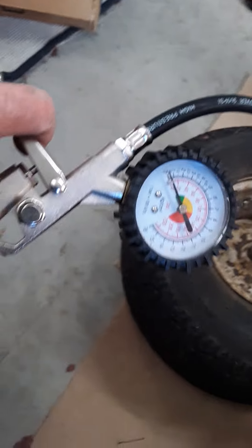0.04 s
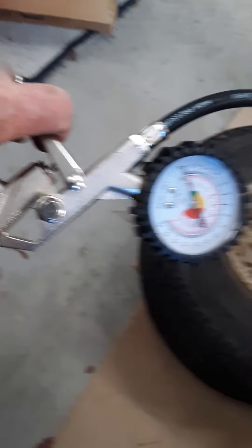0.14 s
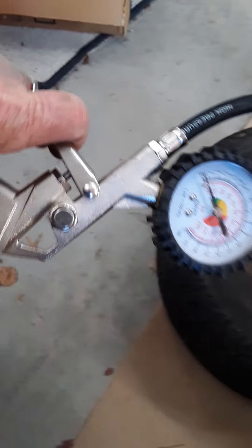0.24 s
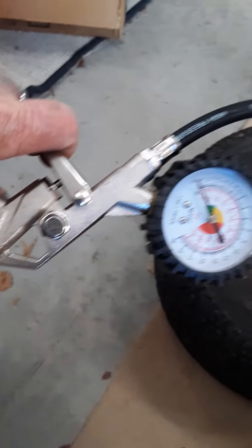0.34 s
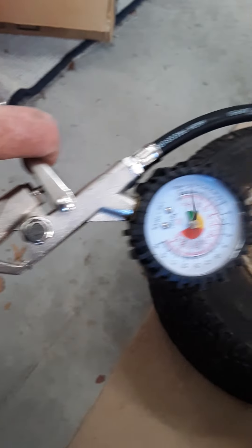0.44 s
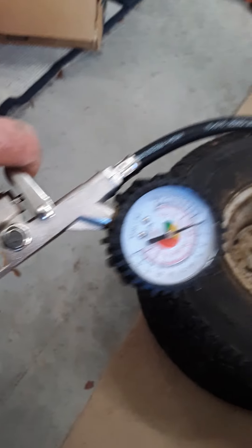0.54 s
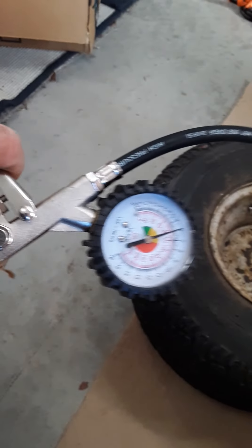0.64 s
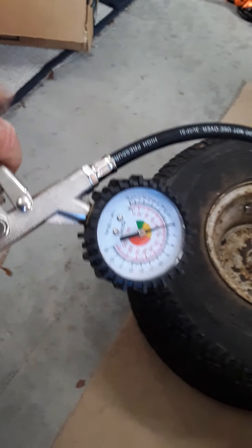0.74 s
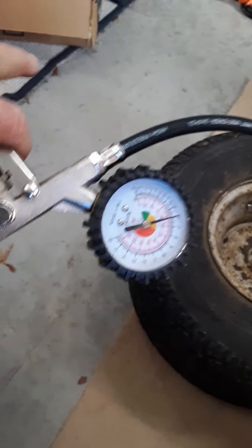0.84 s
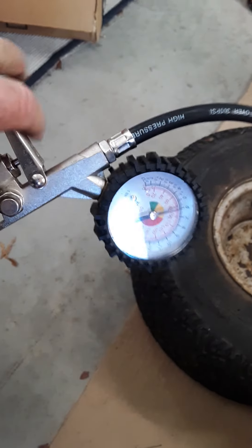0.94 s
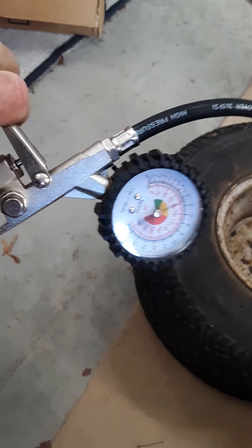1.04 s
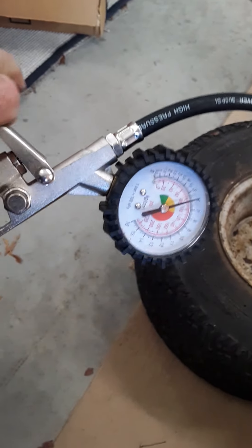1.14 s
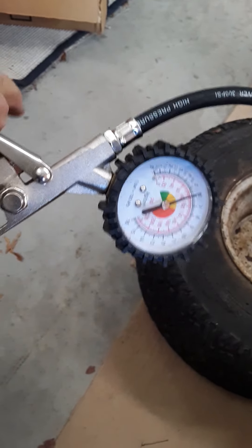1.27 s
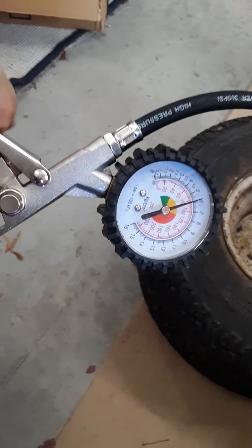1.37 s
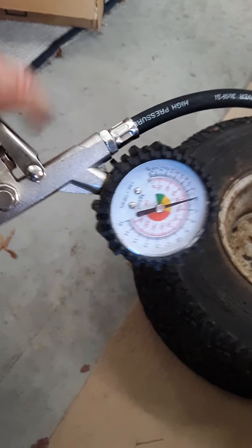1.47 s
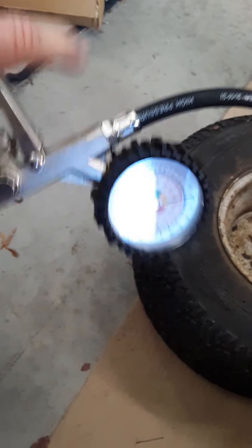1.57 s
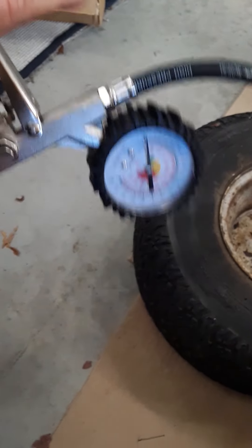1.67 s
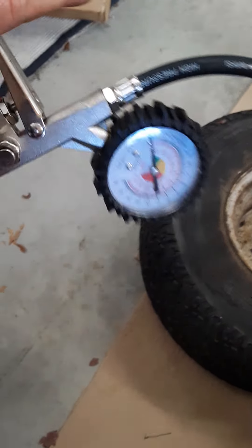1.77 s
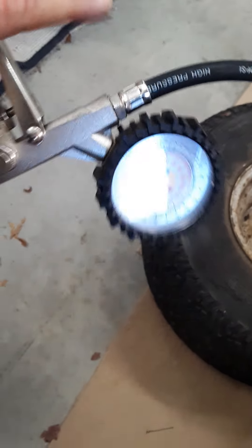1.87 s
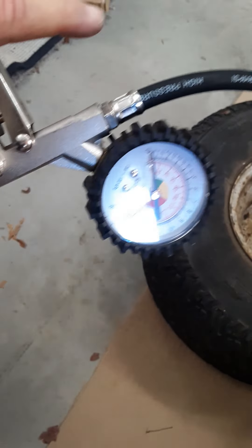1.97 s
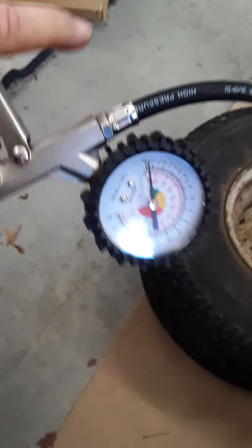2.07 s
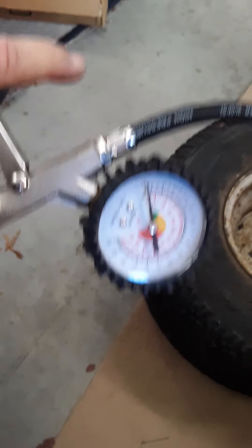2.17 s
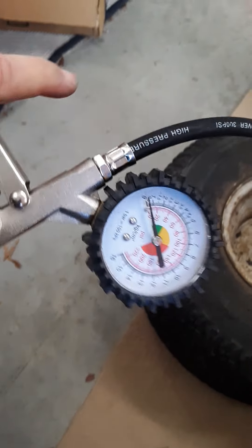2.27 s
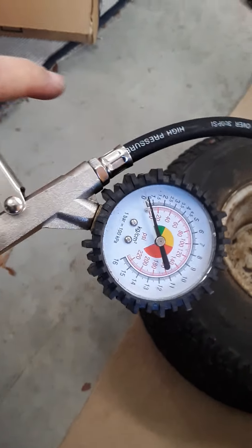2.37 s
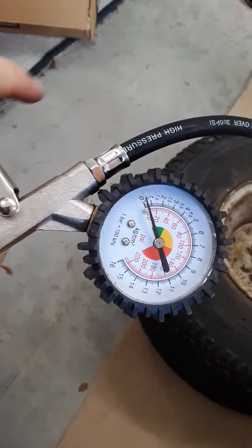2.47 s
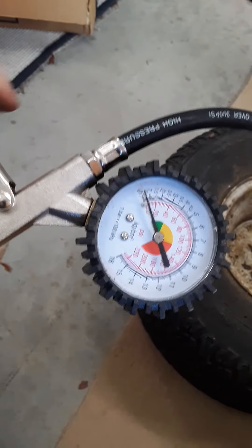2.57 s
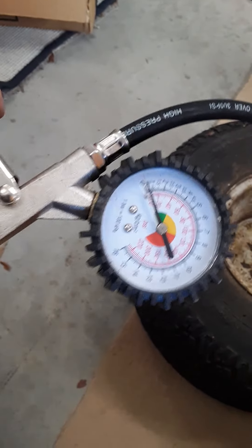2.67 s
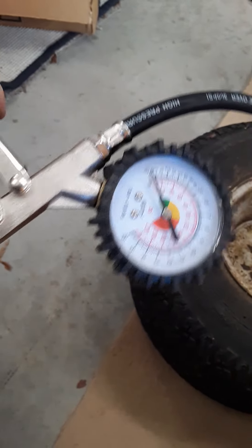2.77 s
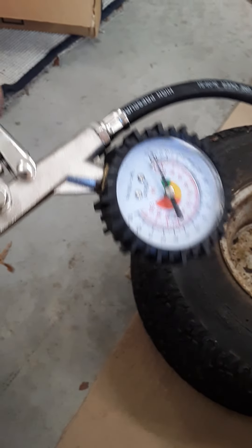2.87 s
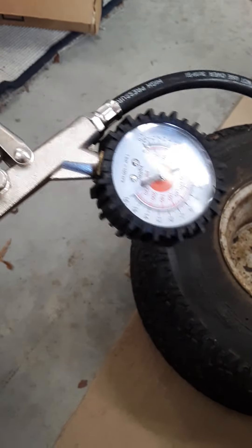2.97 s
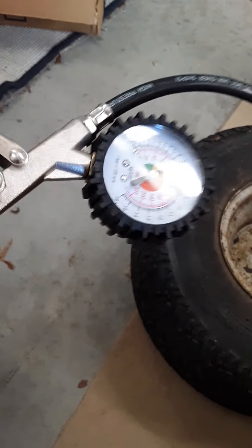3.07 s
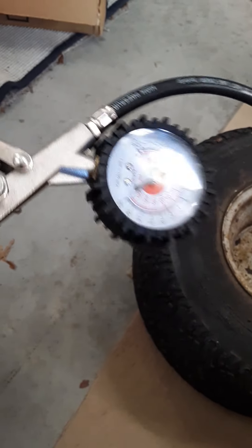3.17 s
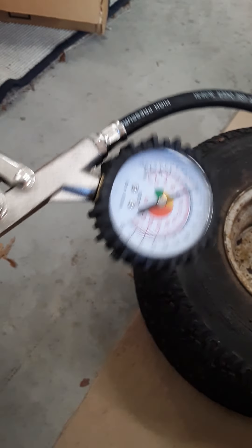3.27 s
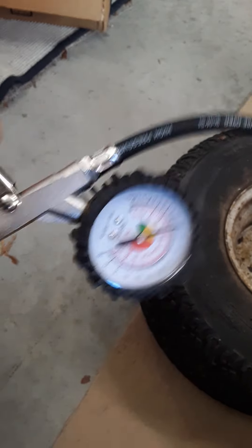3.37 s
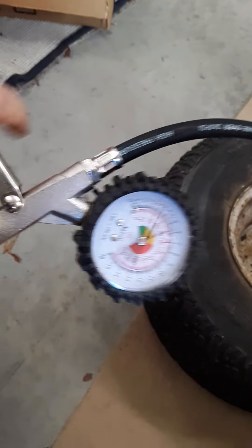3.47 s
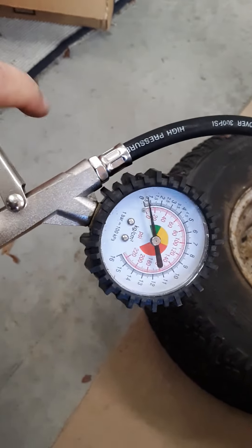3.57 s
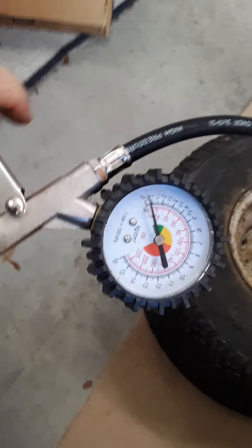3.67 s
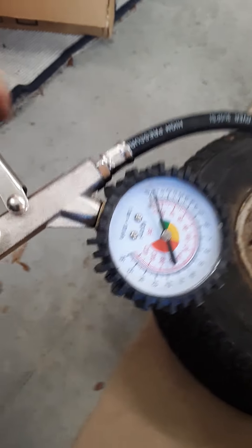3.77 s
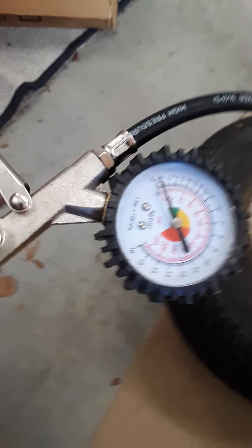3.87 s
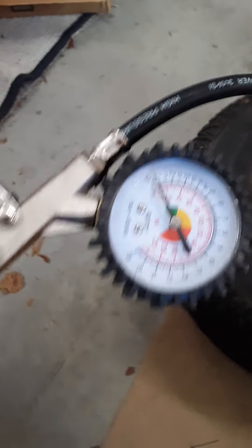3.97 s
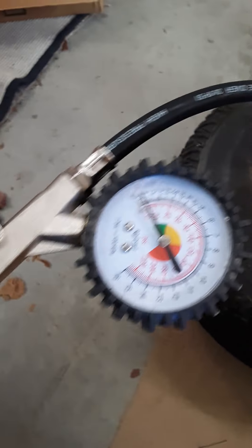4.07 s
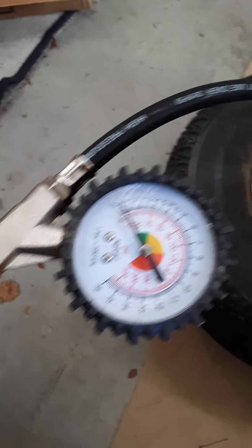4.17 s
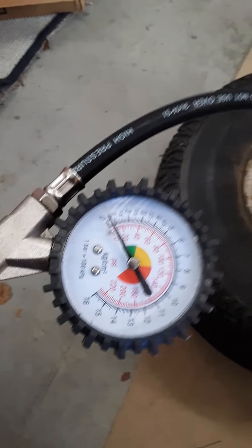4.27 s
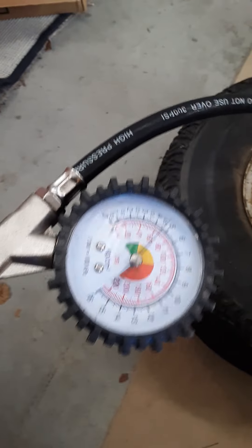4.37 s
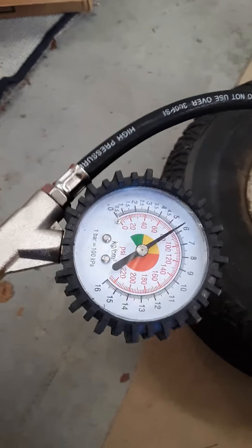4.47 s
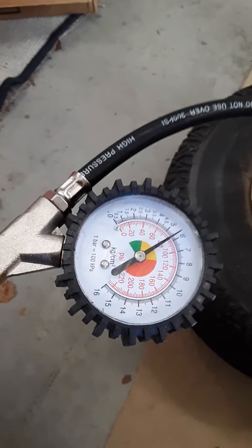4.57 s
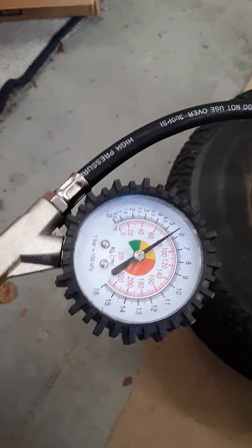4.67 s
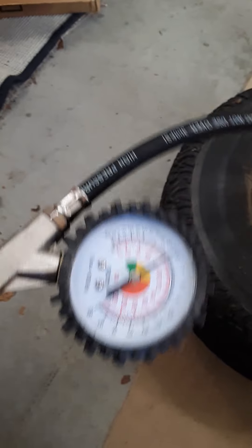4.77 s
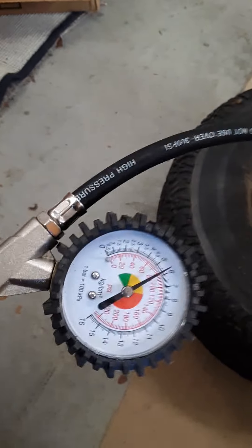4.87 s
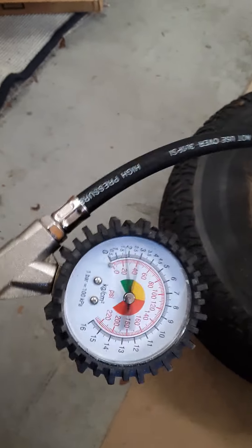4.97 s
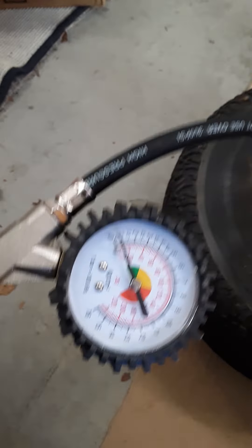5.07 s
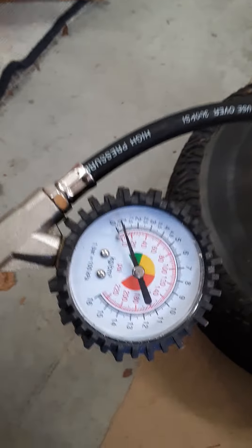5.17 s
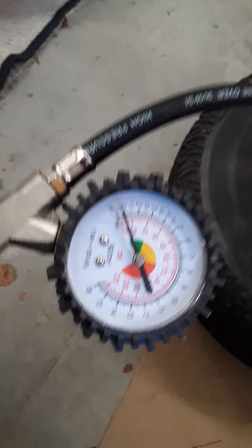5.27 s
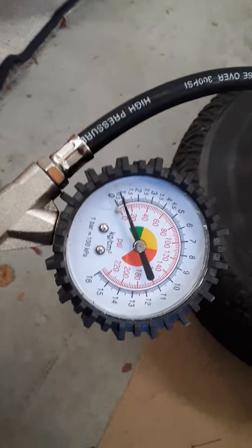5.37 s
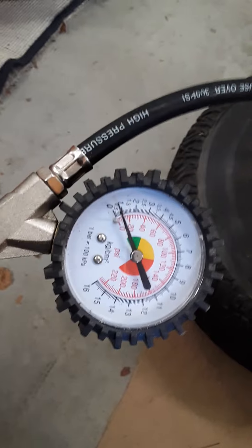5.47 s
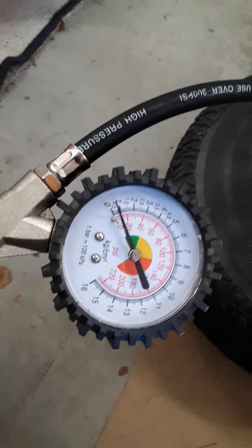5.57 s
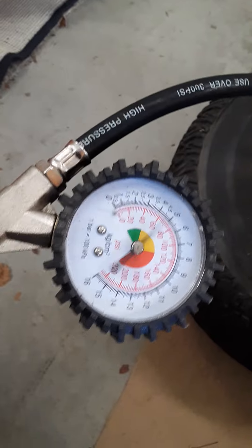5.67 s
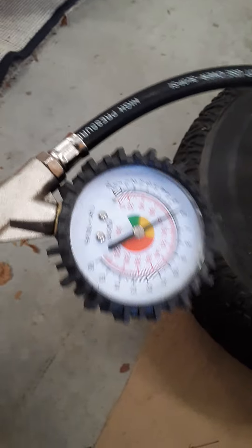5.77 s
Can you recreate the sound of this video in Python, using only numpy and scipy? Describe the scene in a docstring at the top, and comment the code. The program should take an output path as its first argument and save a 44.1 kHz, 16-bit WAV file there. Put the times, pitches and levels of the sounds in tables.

```python
"""A hand inflator fills a small tire on a garage floor, over a low rumble and a faint, wavering hum.
A leaking fitting hisses throughout; a knock and a sliding hose come before the first squeeze.
Two squeezes follow, then a pause and three more; each blows a bright jet through the valve, rings the air
cavities and sounds a fluttering whistle, and the hose tone and the tire's faint ring trail behind.
The hose shudders around the third and fourth squeezes; later the handle scrapes and knocks in a cluster."""
import sys
import numpy as np
from scipy import signal
from scipy.fft import rfft, irfft
from scipy.io import wavfile
from scipy.ndimage import uniform_filter1d, map_coordinates

SR = 44100
rng = np.random.default_rng(int(sys.argv[2]) if len(sys.argv) > 2 else 0)


def unload_wav(signal):
    """Save mono or channel-first audio to the path in sys.argv[1] as 16-bit WAV at rate SR, clipped to [-1, 1]."""
    wavfile.write(
        sys.argv[1],
        SR,
        np.round(np.clip(np.atleast_2d(signal).T, -1, 1) * 32767).astype(np.int16),
    )


N = 256740
TIME = np.arange(N) / SR
FREQS = np.maximum(np.arange(N // 2 + 1) * SR / N, 1)

# squeezes of the lever: press t/s, release t/s, opening time/s, jet level/dB, cavity level/dB,
# whistle level/dB, left-right balance of the jet/dB
SQUEEZES = [(0.431, 1.025, .12, -36, -36, -34.5, -0.9), (1.062, 1.627, 0.062, -35.5, -35.5, -36, -1),
            (2.93, 3.524, 0.026, -35.5, -35.5, -34.5, -1), (4.406, 4.998, 0.018, -34.5, -35, -36, 1.6),
            (5.697, 5.9, 0.022, -34.5, -35, -35, 1.5)]
# how the cavities start and stop ringing
CAVITY_BUILD_S, CAVITY_FADE_S = 0.03, 0.07


def from_db(db):
    """Turn decibels into a gain."""
    return 10 ** (np.asarray(db) / 20)


def rms_one(x):
    """Scale a signal to an rms (average strength) of one."""
    return x / np.sqrt(np.mean(x ** 2) + 1e-20)


def in_time(rows):
    """Draw each column of a table as a curve with a value at every sample."""
    s, *columns = np.transpose(rows)
    return [np.interp(TIME, s, c) for c in columns]


def at_hz(points):
    """Draw a spectrum table as a curve over all frequencies."""
    hz, value = np.transpose(points)
    return np.interp(np.log(FREQS), np.log(hz), value)


def gate(start, end, rise_s, fall_s):
    """Stay at one between start and end, dying away on both sides."""
    before = np.minimum(TIME - start, 0) / rise_s
    after = np.maximum(TIME - end, 0) / fall_s
    return np.exp(np.maximum(before - after, -40))


def strokes(rows, rise_s, fall_s):
    """Add up the loudness curves of a table of strokes."""
    return sum(from_db(db) * gate(start, end, rise_s, fall_s) for start, end, db in rows)


def flutter(rate, depth_db):
    """A random gain that wanders at about the given rate in Hz, keeping the mean power."""
    slow = rms_one(irfft(rfft(rng.standard_normal(N)) / (1 + (FREQS / rate) ** 2), N))
    return rms_one(from_db(depth_db * slow))


def panned(balance_db):
    """Left and right gains whose total power stays constant."""
    gains = from_db(np.array([[.5], [-.5]]) * balance_db)
    return gains / np.sqrt(np.mean(gains ** 2, axis=0))


def pair(mid, side, likeness):
    """Mix two noises into left and right with a given likeness (correlation)."""
    likeness = np.clip(likeness, -.99, .99)
    shared = np.sqrt((1 + likeness) / 2) * mid
    opposed = np.sqrt((1 - likeness) / 2) * side
    return shared + opposed * np.array([[1], [-1]])


def turbulence(spectrum, balance=None):
    """Stereo noise of a given colour; the mean of left and right has unit rms."""
    # likeness of the two microphones: f/Hz, correlation
    ear_likeness = [(100, 0.87), (400, 0.73), (700, 0.65), (1100, 0.2), (2000, 0), (16000, 0)]
    # sound from the middle: f/Hz, left-right balance/dB
    centred = [(20, 0), (20000, 0)]
    if balance is None:
        balance = centred
    white = pair(*rfft(rng.standard_normal((2, N))), at_hz(ear_likeness))
    noise = irfft(white * from_db(at_hz(spectrum)) * panned(at_hz(balance)), N)
    return noise / np.std(noise.mean(axis=0))


def resonance(x, hz, width_hz):
    """Ring at one pitch: a two-pole filter with a gain of one at its peak."""
    r = np.exp(-np.pi * width_hz / SR)
    feed = np.array([1, 0, -1]) * (1 - r * r) / 2
    ring = [1, -2 * r * np.cos(2 * np.pi * hz / SR), r * r]
    return signal.lfilter(feed, ring, x)


def blown(modes):
    """Turbulence keeps each air resonance ringing."""
    out = np.zeros((2, N))
    for hz, width_hz, level_db, balance_db, likeness in modes:
        once = resonance(rng.standard_normal((2, N)), hz, width_hz)
        ringing = resonance(once, hz, width_hz)  # a second pass makes it narrower
        ringing = panned(balance_db) * pair(*ringing, likeness)
        out += from_db(level_db) * ringing / np.std(ringing.mean(axis=0))
    return out


def whistling(modes):
    """A whistle feeds back on itself; here its strength is evened by dividing by its recent power."""
    tone = blown(modes)
    return tone / np.sqrt(uniform_filter1d(tone.mean(axis=0) ** 2, size=500) + 0.78)


def moving_band(centre_hz, width_hz):
    """A band of stereo noise whose centre glides."""
    slow = irfft(rfft(rng.standard_normal((2, 2, N))) / (1 + (2 * FREQS / width_hz) ** 2), N)
    phase = 2 * np.pi * np.cumsum(centre_hz) / SR
    return rms_one(slow[0] * np.cos(phase) + slow[1] * np.sin(phase))


def reflected(x, sway_db):
    """Delayed copies from close surfaces carve notches in the hiss, which drift as the hand moves."""
    # reflections from tire, hand and floor: delay/s, level/dB
    echoes = [(.0009, -10.5), (.0017, -19), (.0031, -10), (.0052, -10)]
    out = x.copy()
    for delay_s, level_db in echoes:
        lag = delay_s * SR * flutter(rate=0.39, depth_db=sway_db)
        places = [np.arange(N) - lag]
        delayed = [map_coordinates(side, places, order=3, mode="mirror") for side in x]
        out += from_db(level_db) * np.array(delayed)
    return out * np.std(x) / np.std(out)


def airflow(squeeze, fade_s, build_s=0.00075, lag_s=0):
    """The response to one squeeze: it follows the opening valve, builds up, holds and fades on release."""
    press, release, opening_s = squeeze[:3]
    t = TIME - lag_s
    opened = np.clip((t - press) / opening_s, 0, 1)
    keep = np.exp(-1 / (build_s * SR))
    built = signal.lfilter([1 - keep], [1, -keep], opened)
    return built * np.exp(-np.clip((t - release) / fade_s, 0, 40))


def room_rumble():
    """Low noise in the room, slowly changing in level."""
    # loudness curve: t/s, level/dB
    rumble_level = [(0, -84), (0.55, -65), (1.3, -62.5), (2.4, -60.5), (5.8, -63.5)]
    # colour of the noise: f/Hz, relative level/dB
    rumble_colour = [(20, -34), (40, -27), (60, 1), (100, 5.5), (170, 4.5), (250, -4.5), (400, -24),
                     (800, -20), (2000, -38)]
    level_db, = in_time(rumble_level)
    return from_db(level_db) * turbulence(rumble_colour)


def room_hum():
    """Something hums faintly: one sine tone that wavers in pitch and strength."""
    # loudness curve: t/s, level/dB
    hum_level = [(0.2, -79), (0.85, -64), (1.3, -60), (2.15, -54), (2.45, -62), (2.75, -54.5),
                 (3.55, -72.5), (3.9, -64), (5.0, -58.5), (5.3, -73), (5.8, -62)]
    level_db, = in_time(hum_level)
    pitch_hz = 131.5 * flutter(rate=6.5, depth_db=0.26)
    tone = np.sqrt(2) * np.sin(2 * np.pi * np.cumsum(pitch_hz) / SR)
    return from_db(level_db) * tone * flutter(rate=5.1, depth_db=3.5)


def leak():
    """A fitting hisses all the time, sputtering slightly; it weakens as the open valve drains the pressure."""
    # strength of the leak: t/s, hiss level/dB, fine spray level/dB, low rush level/dB,
    # centre f/Hz of the gliding band in the hiss
    leak_course = [(0.0, -54.5, -51.1, -54, 7200), (0.4, -52, -50.1, -49, 6370),
                   (2.05, -48.7, -49, -54, 6140), (2.7, -46.5, -49, -52.5, 6480),
                   (4.1, -46, -49, -47.5, 7305), (5.25, -47, -46, -50, 6360), (5.7, -46.5, -44, -49, 7340)]
    # colours of the hiss, spray and rush: f/Hz, relative level/dB
    hiss_colour = [(1500, -34), (3000, -18), (4000, -5.5), (5000, -2.5), (6000, 0), (6700, -1),
                   (7700, -1.5), (8500, -7.5), (11000, -11)]
    spray_colour = [(6000, -54), (8500, -7.5), (10000, -6), (12000, -0.5), (14000, -3), (16000, -1.5)]
    rush_colour = [(300, -21.5), (800, -27), (1200, -23), (1500, -10.5), (1800, 0), (2200, -4), (2450, -2),
                   (2620, 1.5), (2850, -4.5), (3100, -5.5), (4500, -17)]
    # side the leak is heard on: f/Hz, left-right balance/dB
    leak_balance = [(60, -6), (99, 8), (160, 0.0), (270, 0.5), (450, 9), (740, 0.5), (1220, 1), (2010, -8),
                    (3330, 2), (5500, -5), (9080, 1), (15000, -2.0)]
    drop_db, drain_s, refill_s = -7, 0.095, 0.013
    hiss_db, spray_db, rush_db, centre_hz = in_time(leak_course)
    steady_hiss = from_db(0.83) * turbulence(hiss_colour, leak_balance)
    gliding_hiss = from_db(-3.5) * panned(-7) * moving_band(centre_hz, width_hz=1200)
    hiss = from_db(hiss_db) * (steady_hiss + gliding_hiss)
    spray = from_db(spray_db) * turbulence(spray_colour, leak_balance)
    rush = from_db(rush_db) * turbulence(rush_colour, leak_balance)
    drained = np.max([airflow(squeeze, refill_s, drain_s) for squeeze in SQUEEZES], axis=0)
    escaping = reflected(hiss + spray + rush, sway_db=1.0)
    return from_db(drop_db * drained) * escaping * flutter(rate=22, depth_db=0.5)


def hose_slides():
    """Rubber slides with a soft rub that swells toward the end of each move."""
    # moves of the hose: start t/s, end t/s, final level/dB
    moves = [(0.198, 0.39, -55.5), (0.478, 0.76, -54), (1.12, 1.75, -46.5), (3.822, 4.295, -48.5),
             (5.6, 5.82, -61.5)]
    # colour of the rub: f/Hz, relative level/dB
    rub_colour = [(100, -43), (230, -10.5), (340, 3.5), (430, -7.5), (560, -16.5), (800, -14.5),
                  (1100, -13.5), (2000, -15)]
    swell_db_per_s = 14.5
    sliding = 0
    for start, end, final_db in moves:
        level_db = final_db + swell_db_per_s * np.minimum(TIME - end, 0)
        sliding = sliding + from_db(level_db) * gate(start, end, rise_s=0.013, fall_s=0.093)
    return sliding * turbulence(rub_colour)


def hose_drags():
    """The dragged hose gives a low shudder, made from short bursts of low noise."""
    # drags: start t/s, end t/s, level/dB
    drags = [(2.845, 2.969, -44.5), (3.115, 3.172, -42.5), (4.492, 4.646, -48), (4.67, 4.768, -54.5)]
    # colour of the shudder: f/Hz, relative level/dB
    shudder_colour = [(60, -79), (120, -11), (170, 6), (250, 3), (340, -4.5), (450, -12.5), (800, -15.5),
                      (1500, -15)]
    return strokes(drags, rise_s=0.018, fall_s=0.029) * turbulence(shudder_colour)


def handle_scrapes():
    """The handle scrapes: noise made gritty by a fast, uneven flutter."""
    # scrapes: start t/s, end t/s, level/dB
    scrapes = [(3.95, 4.2, -73), (4.2, 4.33, -58), (4.48, 4.72, -52.5), (5.72, 5.82, -59)]
    # colour of the grit: f/Hz, relative level/dB
    grit_colour = [(250, -6), (450, -10.5), (650, -1.5), (820, -2), (1100, -21), (1600, -13.5)]
    grit = turbulence(grit_colour) * flutter(rate=52, depth_db=4)
    return strokes(scrapes, rise_s=0.0081, fall_s=0.025) * grit


def handle_knocks(width_hz=190, decay_s=0.0085, rattle_db=-19):
    """Each knock is a tap and a short rattle in one damped resonance."""
    # light knocks of the handle: t/s, peak level/dB, pitch f/Hz
    taps = [(0.193, -42, 1390), (0.195, -47.5, 400), (0.548, -51, 1100), (1.476, -40, 1000),
            (1.642, -39, 401), (2.282, -53, 673), (3.059, -39, 1110), (4.234, -37.5, 680),
            (4.298, -40, 436), (4.4, -40, 586), (4.532, -43, 1070), (4.579, -36.5, 640), (4.623, -38, 695),
            (4.665, -37.5, 577), (4.697, -39, 624), (5.691, -53, 694)]
    out = np.zeros(N)
    for s, peak_db, hz in taps:
        fading = gate(s, s, rise_s=0.00024, fall_s=decay_s)
        force = from_db(rattle_db) * rng.standard_normal(N) * fading
        force[round(s * SR)] += 1  # the tap itself
        knock = resonance(force, hz, width_hz)
        out += from_db(peak_db) * knock / np.abs(knock).max()
    return out


def tire():
    """The air in the tire rings faintly, well after the valve opens."""
    # ring of the tire: f/Hz, width of each filter pass/Hz, relative level/dB,
    # left-right balance/dB, left-right likeness
    tire_modes = [(463, 9.3, 2.5, -1, 0.74)]
    lag_s, build_s, fade_s = 0.2, 0.16, 0.093
    flow = sum(airflow(squeeze, fade_s, build_s, lag_s) for squeeze in SQUEEZES)
    return from_db(-72.5) * flow * blown(tire_modes)


def hose():
    """Air moving along the hose sings in a cluster of close resonances; most of it trails the valve."""
    # resonances of the hose: f/Hz, width of each filter pass/Hz, relative level/dB,
    # left-right balance/dB, left-right likeness
    hose_modes = [(1679, 19, -9.6, -0.7, 0.2), (1765, 16, -9.5, -6.5, 0.1), (1797, 20, -4.5, -2.5, 0.5),
                  (1818, 60, -9, -2.5, 0.3), (1886, 22, -7.9, -7.2, -0.4), (1964, 50, -10.2, -7.8, -0.5)]
    lag_s, build_s, fade_s = 0.13, 0.06, 0.085
    late = sum(airflow(squeeze, fade_s, build_s, lag_s) for squeeze in SQUEEZES)
    prompt = sum(airflow(squeeze, CAVITY_FADE_S, CAVITY_BUILD_S) for squeeze in SQUEEZES)
    flow = from_db(-45) * late + from_db(-57) * prompt  # a small share starts without the lag
    return flow * blown(hose_modes)


def low_whistle():
    """A lower whistle catches briefly during the third squeeze."""
    # when it catches: start t/s, end t/s, level/dB
    catches = [(3.165, 3.235, -35.5)]
    # its resonance: f/Hz, width of each filter pass/Hz, relative level/dB,
    # left-right balance/dB, left-right likeness
    low_modes = [(3208, 14, 0, -11, -.2)]
    return strokes(catches, rise_s=.012, fall_s=0.021) * whistling(low_modes)


def valve_whistle():
    """A fluttering whistle that needs nearly full airflow and flares up at moments."""
    # resonance of the whistle: f/Hz, width of each filter pass/Hz, relative level/dB,
    # left-right balance/dB, left-right likeness
    whistle_modes = [(4924, 56, 0, -6, .7)]
    # moments when it catches more strongly: start t/s, end t/s, added level/dB
    flares = [(.68, .705, -32), (.775, .808, -31), (.838, .856, -30), (.893, .91, -38), (.948, .968, -33),
              (3.01, 3.03, -38.5), (4.59, 4.61, -30)]
    steepness = 1.9  # the whistle grows as this power of the flow
    gain = 0
    for squeeze in SQUEEZES:
        whistle_db = squeeze[5]
        gain = gain + from_db(whistle_db) * airflow(squeeze, CAVITY_FADE_S) ** steepness
    gain = gain * flutter(rate=26, depth_db=1.5) + strokes(flares, rise_s=0.0065, fall_s=.008)
    return gain * whistling(whistle_modes)


def valve_cavities():
    """Air rushing through the valve keeps many small air cavities ringing."""
    # cavity resonances: f/Hz, width of each filter pass/Hz, relative level/dB,
    # left-right balance/dB, left-right likeness
    cavity_modes = [(1434, 80, -19.7, -5.8, 0.4), (1490, 36, -19.2, -3.4, 0.8),
                    (2229, 134, -19.2, -4.0, 0.2), (2572, 90, -14.2, -3.9, 0.0),
                    (2658, 140, -17.0, -2.6, 0.2), (2840, 31, -20.0, -3.3, 0.3),
                    (2908, 57, -15.3, -6.8, 0.3), (2977, 58, -18.8, -4.7, -0.2),
                    (3218, 62, -10.8, -6.4, -0.3), (3528, 94, -13.8, -1.2, 0.3),
                    (3592, 47, -12.8, -1.5, 0.7), (3676, 34, -16.4, -3.1, -0.1),
                    (3853, 75, -10.9, -3.6, 0.3), (3973, 71, -18.1, -1.2, -0.1),
                    (4085, 56, -10.5, -6.9, 0.2), (4192, 101, -16.3, -2.9, 0.4),
                    (4346, 95, -10.4, -0.7, 0.4), (4519, 59, -12.7, -4.9, 0.3),
                    (4618, 140, -13.3, -0.6, 0.3), (4699, 140, -10.5, -0.6, 0.5),
                    (5018, 124, -12.2, -5.5, 0.2), (5221, 57, -12.8, 1.9, 0.5),
                    (5692, 49, -21.8, -3.8, -0.2), (5882, 87, -13.9, -1.5, 0.2),
                    (6162, 140, -15.1, -1.0, 0.2), (6609, 42, -14.3, -1.9, 0.2)]
    gain = 0
    for squeeze in SQUEEZES:
        cavity_db = squeeze[4]
        gain = gain + from_db(cavity_db) * airflow(squeeze, CAVITY_FADE_S, CAVITY_BUILD_S)
    return gain * blown(cavity_modes) * flutter(rate=8.8, depth_db=.6)


def valve_jet():
    """The open valve lets out a bright jet: coloured noise with close echoes and high nozzle resonances."""
    # colour of the jet: f/Hz, relative level/dB
    jet_colour = [(300, -18), (600, -20.5), (900, -17.5), (1250, -19), (2000, -4.5), (3100, -30),
                  (4000, -46), (5000, 0), (6000, 0.5), (7300, 1.5), (8000, -3), (10500, -2.5),
                  (13000, -1.5), (15500, -4)]
    # side the jet is heard on: f/Hz, left-right balance/dB
    jet_balance = [(700, 1.5), (2000, -4), (5000, -1), (6500, 0.5), (7500, 2), (8500, 4), (10500, 11),
                   (11500, -11), (13000, 3.5), (16000, -5)]
    # resonances of the nozzle: f/Hz, width of each filter pass/Hz, relative level/dB,
    # left-right balance/dB, left-right likeness
    nozzle_modes = [(11900, 110, -31, 8, .3), (11400, 110, -15, 9, .3), (11940, 380, -18, 17, .2),
                    (13880, 200, -14, -1, -.2), (15070, 120, -20, -2, .3), (15520, 250, -11.5, -10, 0)]
    shut_s = 0.041  # the flow dies away as the valve closes
    gain = 0
    for squeeze in SQUEEZES:
        jet_db, balance_db = squeeze[3], squeeze[6]
        gain = gain + from_db(jet_db) * panned(balance_db) * airflow(squeeze, shut_s)
    rush = from_db(2.5) * reflected(turbulence(jet_colour, jet_balance), sway_db=1.5)
    return gain * (rush + blown(nozzle_modes)) * flutter(rate=11, depth_db=.5)


def scene():
    """Add up all sources at the two microphones."""
    room = room_rumble() + room_hum()
    handling = hose_slides() + hose_drags() + handle_scrapes() + handle_knocks()
    trailing = tire() + hose()
    valve = low_whistle() + valve_whistle() + valve_cavities() + valve_jet()
    return room + leak() + handling + trailing + valve


def record(dry):
    """The microphones lose the deep bass; the top is cut steeply."""
    cutoff_hz = 15770
    thin = signal.sosfilt(signal.butter(4, 50, "high", fs=SR, output="sos"), dry)
    return irfft(rfft(thin) / np.sqrt(1 + (FREQS / cutoff_hz) ** 400), N)


dry = scene()
out = record(dry)
unload_wav(out)
```